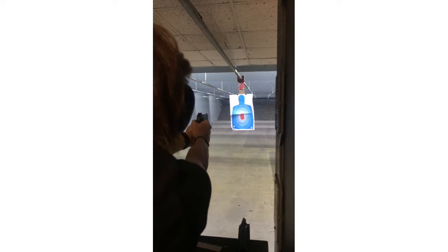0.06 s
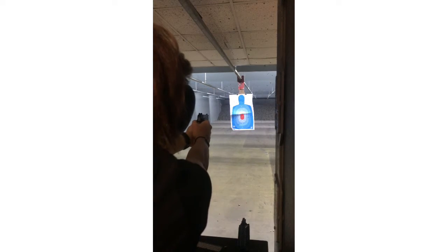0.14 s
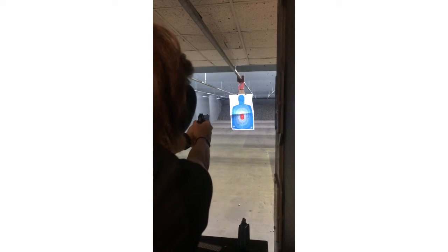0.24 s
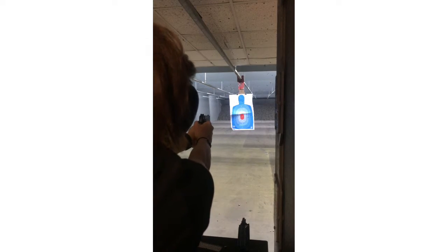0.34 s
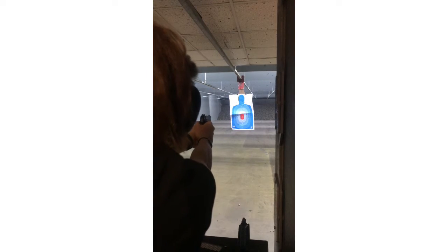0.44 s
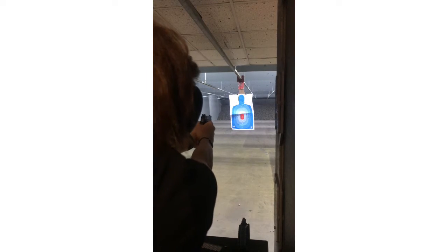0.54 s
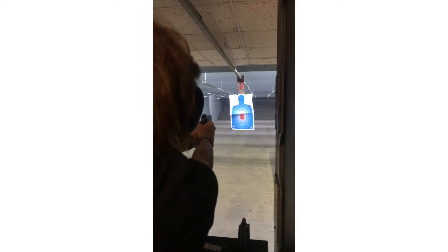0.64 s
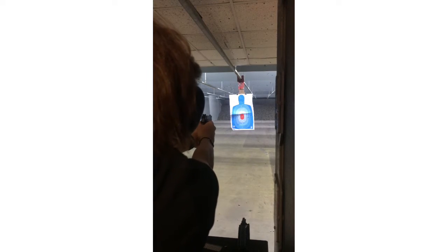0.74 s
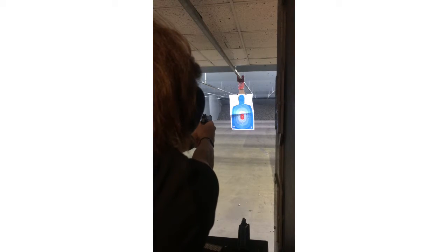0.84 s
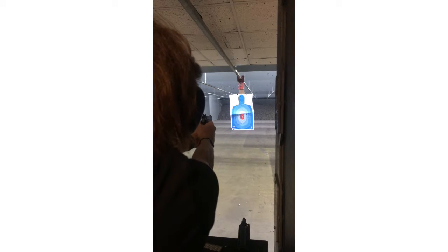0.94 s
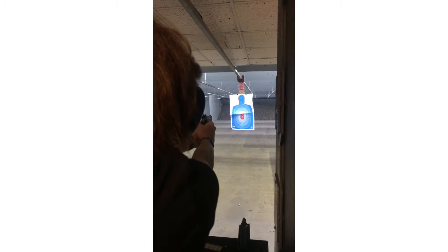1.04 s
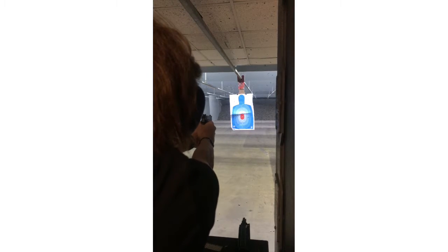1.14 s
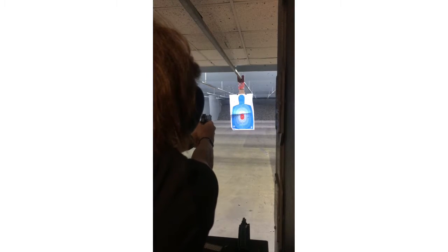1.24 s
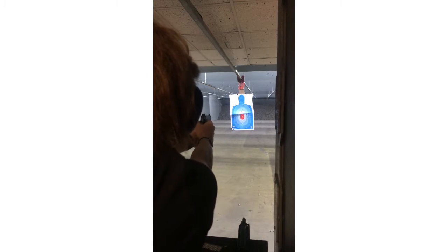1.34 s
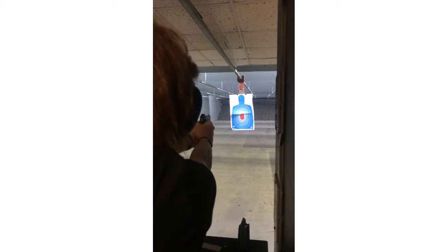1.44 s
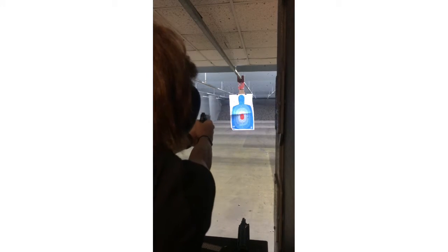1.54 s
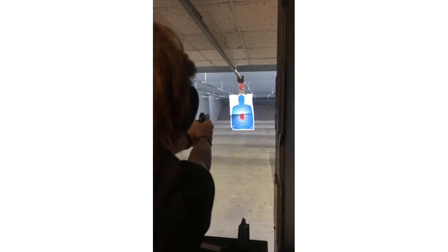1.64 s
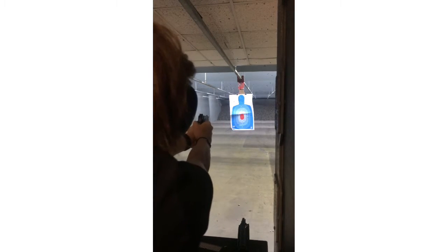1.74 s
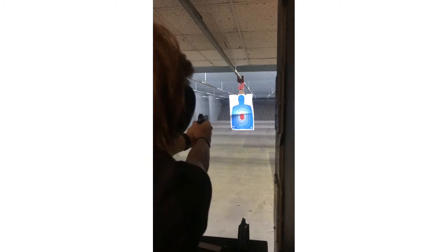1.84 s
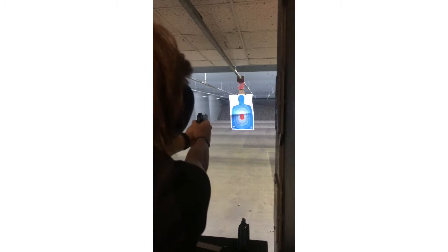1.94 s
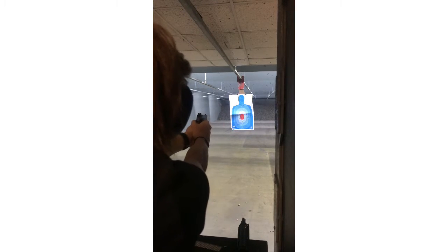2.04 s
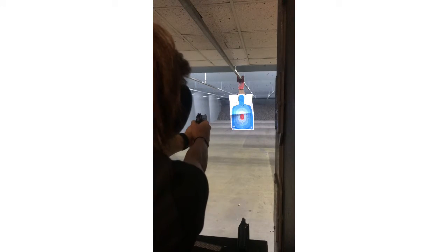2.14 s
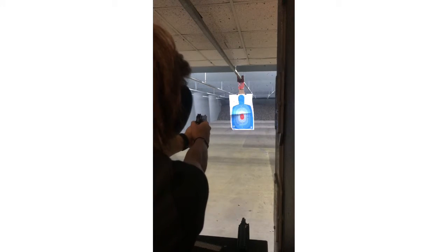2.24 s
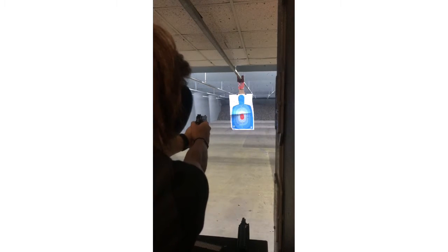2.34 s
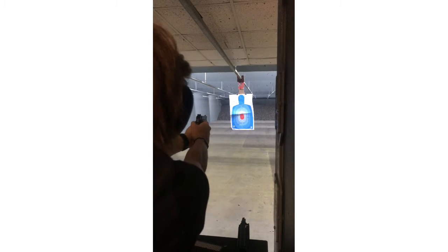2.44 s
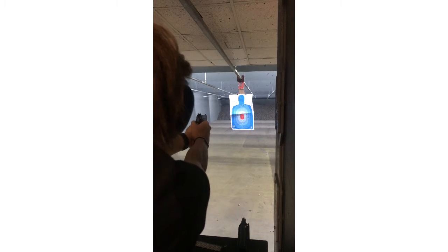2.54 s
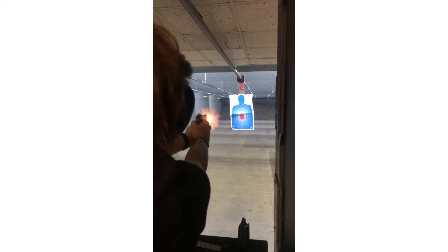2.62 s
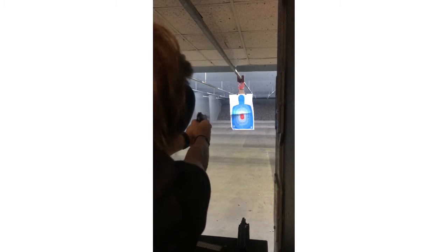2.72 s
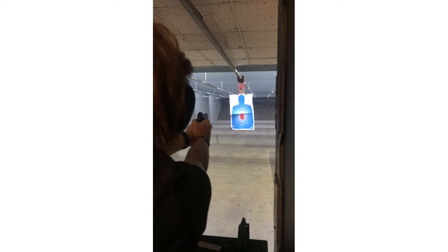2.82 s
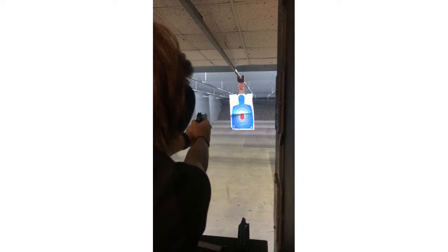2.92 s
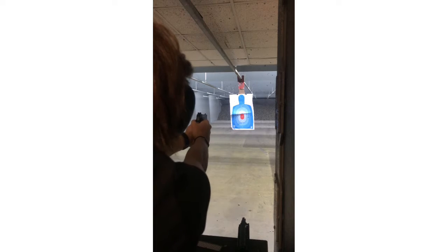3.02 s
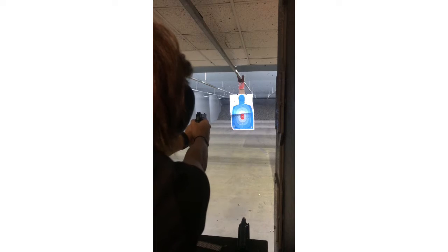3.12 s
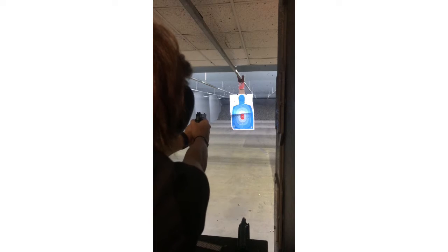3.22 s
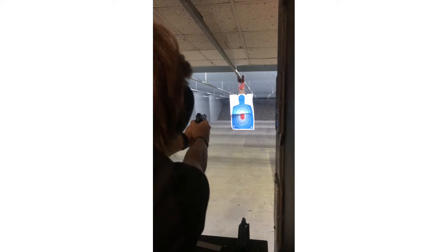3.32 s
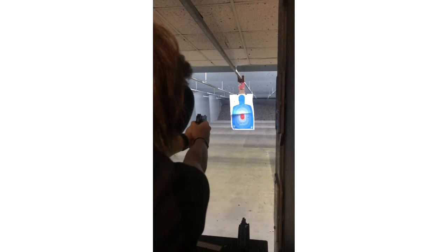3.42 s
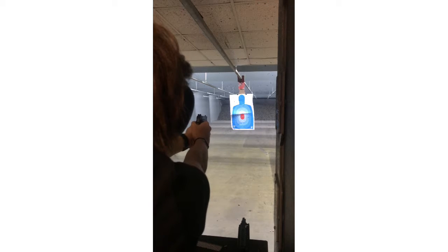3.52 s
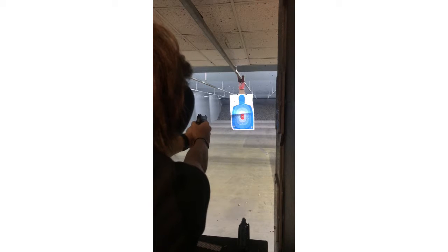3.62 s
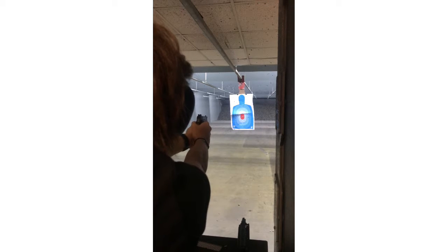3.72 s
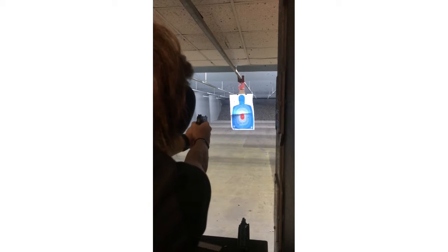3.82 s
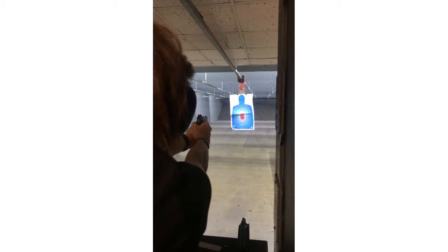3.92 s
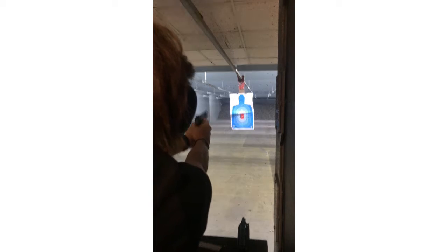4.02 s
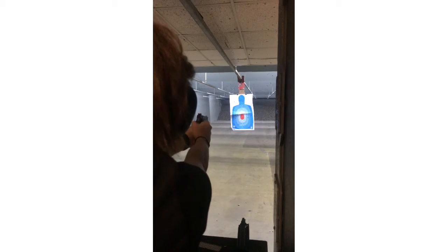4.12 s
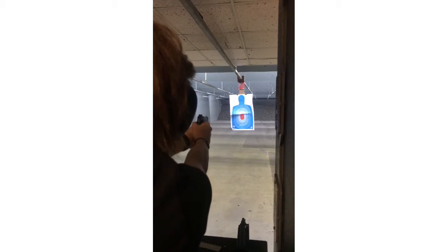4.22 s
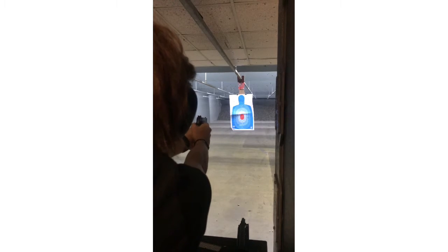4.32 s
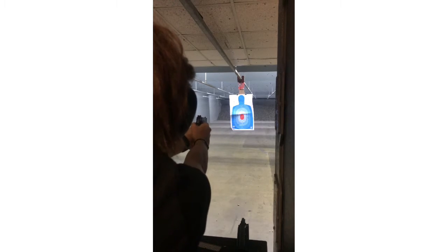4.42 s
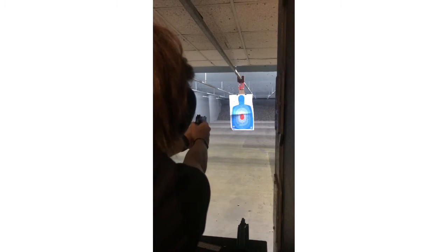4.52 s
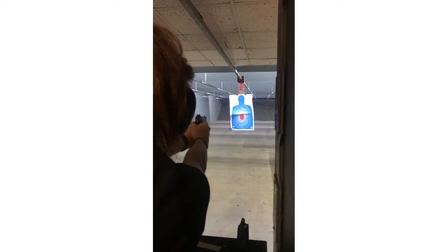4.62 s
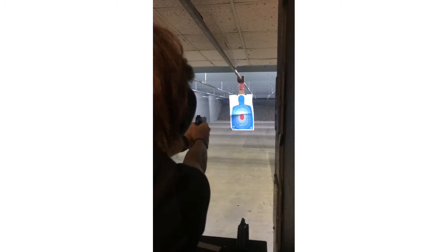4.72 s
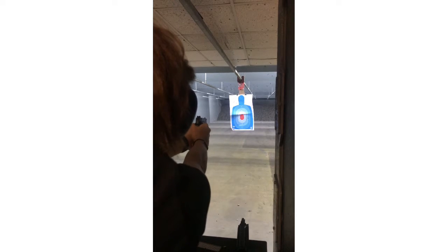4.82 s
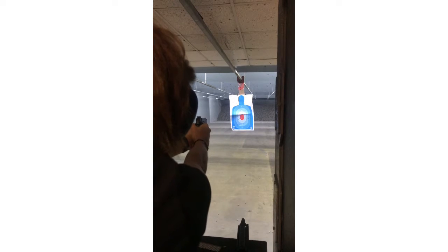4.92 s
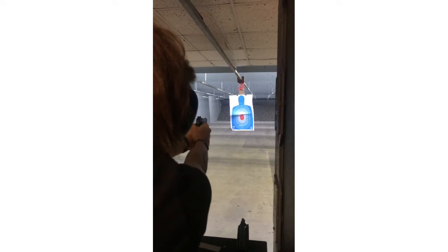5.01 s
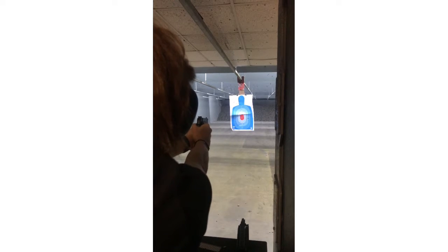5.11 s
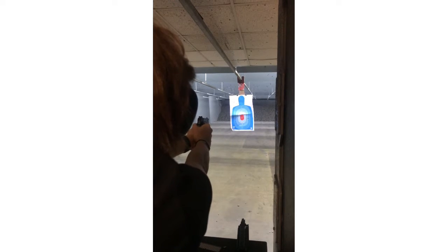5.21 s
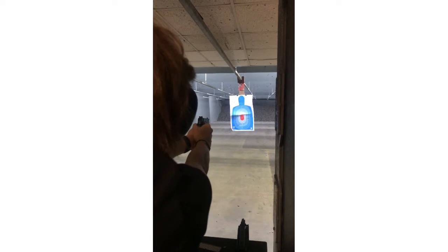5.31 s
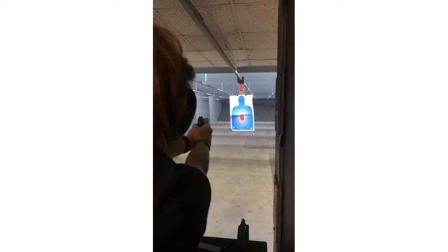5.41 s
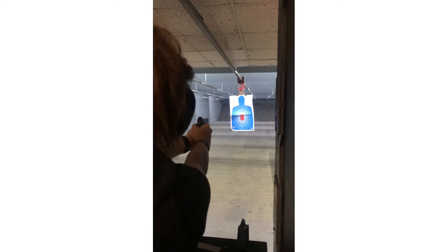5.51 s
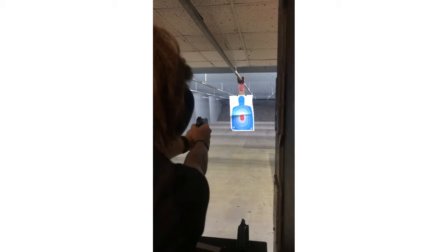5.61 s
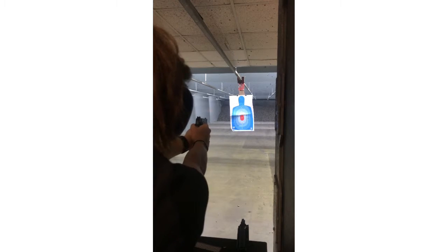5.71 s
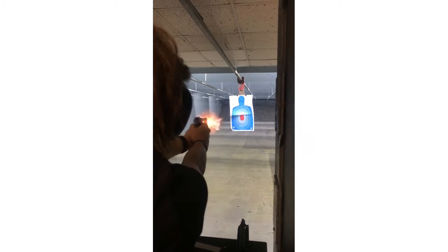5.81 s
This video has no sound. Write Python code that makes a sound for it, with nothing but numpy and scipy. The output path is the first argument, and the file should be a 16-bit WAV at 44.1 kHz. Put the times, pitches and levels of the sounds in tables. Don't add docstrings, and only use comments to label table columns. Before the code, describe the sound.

A handgun fires four spaced shots in a hard-walled booth; roar and lane echo fade into fan drone while spent cases click and ring.

```python
import sys
import numpy as np
from scipy import signal
from scipy.fft import rfft, irfft
from scipy.io import wavfile
from scipy.ndimage import uniform_filter1d

SR = 44100
rng = np.random.default_rng(int(sys.argv[2]) if len(sys.argv) > 2 else 0)


def volts_from_decibels(level):
    exponent = np.asarray(level, float) / 20
    return 10 ** exponent


def file_out(sig):
    cols = np.atleast_2d(sig).T
    lim = np.clip(cols, -1, 1)
    pcm = np.round(lim * 32767).astype(np.int16)
    wavfile.write(sys.argv[1], SR, pcm)


N = 258422


def read(points, at):
    return np.interp(at, *np.transpose(points), left=-120, right=-120)


def colour(points, hz):
    point_hz, value = np.transpose(points)
    return np.interp(np.log(hz + 1), np.log(point_hz + 1), value)


def evened(x):
    return x / np.sqrt(np.mean(x ** 2) + 1e-20)


def add(mix, s, sound):
    at = round(s * SR)
    part = mix[max(at, 0):][:len(sound) + min(at, 0)]
    part += sound[max(-at, 0):][:len(part)]


def resonate(x, hz, width):
    turn = np.exp(2j * np.pi * np.cumsum(hz * np.ones(len(x))) / SR)
    r = np.exp(-np.pi * width / SR)
    return 2 * (turn * signal.lfilter([1 - r], [1, -r], x / turn + 1e-18)).real


def resonate_twice(x, hz, width):
    return resonate(resonate(x, hz, width), hz, width)


def hiss(count, spectrum, change_db, size=512, patchy_db=1.5):
    hop = size // 4
    t = np.arange(count // hop + 5) * hop / SR
    hz = np.fft.rfftfreq(size, 1 / SR)[:, None]
    real, imaginary, patches = rng.standard_normal((len(t), len(hz), 3)).T
    patches = uniform_filter1d(patches, size=5, axis=0)
    patches = evened(uniform_filter1d(patches, size=8, axis=1))
    z = (real + 1j * imaginary) * volts_from_decibels(colour(spectrum, hz) + patchy_db * patches)
    both = np.array([z, z * volts_from_decibels(change_db(t, hz))])
    plain, shaped = signal.istft(both, nperseg=size, noverlap=size - hop)[1]
    return shaped[:count] / plain.std()


def echo(curve, spectrum, fade, from_s, size):
    t = np.arange(2 * SR) / SR

    def fade_db(s, hz):
        return -colour(fade, hz) * np.clip(s - from_s, -.2, .5)

    return hiss(len(t), spectrum, fade_db, size=size) * volts_from_decibels(read(curve, t))


# after_shot_s, level_db
ROAR_CURVE = [(0, -10), (.025, -11), (.035, -12), (.05, -8.5), (.085, -12), (.15, -25.5), (.2, -37.5),
              (.24, -48), (.4, -68)]
# freq_hz, level_db_per_hz
ROAR_COLOUR = [(71, -54), (120, -9), (417, -5.5), (567, 2), (628, -8), (819, -2.5), (1450, -10),
               (1820, -11), (2320, -13), (3220, -11), (3950, -14.5), (6330, -17), (12700, -26.5),
               (15900, -32.5)]
# freq_hz, loss_db_per_s
ROAR_FADE = [(60, 46), (250, -41), (700, 0), (2500, 50.5), (7000, 22), (13000, 62.5)]


def roar():
    return echo(ROAR_CURVE, ROAR_COLOUR, ROAR_FADE, 0.042, size=512)


# after_shot_s, level_db
LANE_CURVE = [(.1, -29), (.205, -36.5), (.235, -35), (.31, -36), (.4, -38.5), (.5, -45.5), (.7, -54),
              (1, -65.5), (1.5, -87.5)]
# freq_hz, level_db_per_hz
LANE_COLOUR = [(88, -37), (150, -11.5), (197, -5.5), (226, 2.5), (321, 4.5), (493, -28), (588, -7),
               (757, -7), (3750, -8.5), (7130, -18.5), (10500, -37), (12600, -50), (15900, -62.5)]
# freq_hz, loss_db_per_s
LANE_FADE = [(300, -1), (800, 20.5), (2500, -5), (7000, 10.5), (13000, 87)]


def lane_return():
    return echo(LANE_CURVE, LANE_COLOUR, LANE_FADE, 0.46, size=512)


def boom():
    start_s, rise_s, t60_s = 0.27, 0.031, 1
    t = np.arange(2 * SR) / SR - start_s
    ring = evened(resonate_twice(rng.standard_normal(len(t)), 113, 28))
    return ring * np.clip(t / rise_s, 0, 1) * volts_from_decibels(-30.5 - 60 * np.maximum(t, 0) / t60_s)


def answer():
    return roar() + lane_return() + boom()


def since_shot(t):
    times = np.array([EARLIER_S] + [row[0] for row in SHOTS])
    return t - times[np.searchsorted(times, t, "right") - 1]


def grip(t):
    wait_s, clamp_s, hold_s, release_s = 0.076, 0.067, 0.47, 0.56
    s = since_shot(t) - wait_s
    left = (clamp_s + hold_s + release_s - s) / release_s
    return np.clip(np.minimum(s / clamp_s, left), 0, 1)


# freq_hz, change_db
GRIP_DEPTH = [(30, -25), (80, -10.5), (300, -15), (500, -9.5), (1000, -4.5), (3000, -7.5), (8000, -9.5),
              (14000, -10)]


def air_change(s, hz):
    return colour(GRIP_DEPTH, hz) * grip(s)


# centre_s, depth_db, half_length_s
LULLS = [(0.23, -19, .03), (0.457, -19, 0.012), (1.4, 1, 0.015), (1.756, -14, 0.022), (2, -20, 0.026),
         (3.02, -8, .02), (3.2, -6.5, 0.056), (3.894, -10, 0.039), (4.253, -11, 0.023), (4.473, -20, 0.026),
         (4.622, -10, 0.025), (4.86, -14, 0.031), (5.087, -12, 0.029), (5.594, -16, 0.013),
         (5.813, -8, 0.017)]


def fan():
    blade_hz, level_db, grip_db = 77.86, -23.5, -11.5
    blur_hz, blur_db = 12, -15
    t = np.arange(N) / SR
    slow = signal.butter(2, 14, fs=SR, output="sos")
    wander = evened(signal.sosfilt(slow, rng.standard_normal(N)))
    tone = np.sqrt(2) * np.sin(2 * np.pi * blade_hz * t + 0.37 * wander)
    blur = evened(resonate_twice(rng.standard_normal(N), blade_hz, blur_hz))
    lull_db = sum(db * np.exp(-((t - s) / half) ** 2) for s, db, half in LULLS)
    return volts_from_decibels(level_db + grip_db * grip(t) + lull_db) * (tone + volts_from_decibels(blur_db) * blur)


# freq_hz, level_db_per_hz
AIR_COLOUR = [(15, -45.5), (25, -23), (43, -10.5), (64, -9), (82, -7), (107, -12), (235, -11.5),
              (528, -38.5), (605, -42), (751, -39), (1010, -38.5), (2820, -49), (3790, -50), (12100, -70),
              (15900, -81.5)]
# pitch_hz, width_hz, level_db
DUCT = [(620, 18, -50.5), (990, 64, -57.5)]


def ventilation():
    air = hiss(N, AIR_COLOUR, air_change, size=2048, patchy_db=1.6)
    whistles = sum(volts_from_decibels(db) * evened(resonate(rng.standard_normal(N), hz, w)) for hz, w, db in DUCT)
    whistles = whistles * volts_from_decibels(-3.0 - 6.3 * grip(np.arange(N) / SR))
    both = volts_from_decibels(-30 + 2.0) * air + whistles + fan()
    return signal.sosfiltfilt(signal.butter(3, 38, "high", fs=SR, output="sos"), both)


def tick(hz, width, t60):
    t = np.arange(SR // 3) / SR
    blow = resonate_twice(1. * (t == 0), hz, width)
    scatter = evened(resonate_twice(rng.standard_normal(len(t)), hz, width))
    decay = volts_from_decibels(-6.0 - 60 * t / 0.0095) + volts_from_decibels(-8 - 60 * t / t60) + volts_from_decibels(-45 - 60 * t / .3)
    return 0.96 * blow / abs(blow).max() + scatter * decay


def tube_ring(db, hz, t60):
    t = np.arange(SR // 3) / SR
    tube = np.sin(2 * np.pi * hz * t) + .4 * np.sin(2 * np.pi * (hz + 85) * t)
    lower = 0.3 * np.sin(2 * np.pi * .46 * hz * t) * volts_from_decibels(-60 * t / .1)
    ring = volts_from_decibels(db - 60 * t / t60) * (tube + lower) * np.minimum(t / 0.00092, 1)
    fuzz = evened(resonate(rng.standard_normal(len(t)), hz, 140))
    return ring + volts_from_decibels(db - 9.5 - 60 * t / (2 * t60)) * fuzz


# start_s, level_db, centre_hz, width_hz, scatter_t60_s
TICKS = [(.392, -54, 13500, 6000, .05), (.8725, -52, 7000, 9000, .05), (.983, -56, 11000, 8000, .04),
         (1.254, -44, 5660, 2000, .05), (1.2545, -46, 10000, 8000, .04), (1.379, -50, 8000, 9000, .05),
         (2.206, -45, 3300, 1470, .04), (2.3005, -30, 800, 700, .08), (2.3017, -32, 2800, 1970, 0.09),
         (2.3008, -41.5, 8500, 6000, 0.072), (3.097, -52, 14000, 4000, .03),
         (3.1905, -35, 4480, 4000, 0.055), (3.1905, -58, 12000, 6000, 0.046), (4.675, -47, 5700, 800, .06),
         (4.674, -44, 7550, 2500, 0.079), (4.674, -44, 13500, 5000, .04), (5.054, -32.5, 3150, 2500, 0.055),
         (5.057, -54, 5560, 2500, 0.087), (5.1429, -34, 5000, 3940, 0.052), (5.144, -48, 1900, 900, .04),
         (5.1433, -57, 13000, 6000, .04), (5.1897, -49, 2310, 1500, .04)]
# start_s, level_db, centre_hz, width_hz, scatter_t60_s
KNOCK = (5.1897, -32, 1030, 450, .04)
# start_s, level_db, pitch_hz, t60_s
RINGS = [(.393, -64, 12250, .2), (.873, -57, 12250, .25), (0.982, -48, 12260, 0.13),
         (1.255, -56, 12250, .2), (1.379, -52, 12280, 0.15), (1.816, -44, 12250, 0.093),
         (2.5, -72, 12300, .1), (3.1, -66, 11800, .1), (4.674, -49.5, 11780, 0.11), (5.058, -70, 11700, .1),
         (5.144, -50, 11700, 0.14), (5.385, -69, 11750, .12)]


def cases():
    out = np.zeros(N)
    for s, db, hz, width, t60 in [*TICKS, KNOCK]:
        add(out, s, volts_from_decibels(db) * tick(hz, width, t60))
    for s, db, hz, t60 in RINGS:
        add(out, s, tube_ring(db, hz, t60))
    return out


CHOKE_S = .022
# pitch_hz, width_hz, level_db
CHOKED = [(269.5, 110, -14), (617, 260, -2.5), (1242, 1300, -3.5), (2160, 1100, -9.5), (2856, 300, -7.5)]


def choke(rise_db, low_db):
    t = np.arange(round(1.5 * CHOKE_S * SR)) / SR
    u = t / CHOKE_S
    noise = rng.standard_normal(len(t))
    throb_db = 4.5 * np.cos(2 * np.pi * 340 * t) * np.clip(1.2 - u, 0, 1)
    flutter = volts_from_decibels(-33.5 - 4.8 * u + throb_db) * evened(signal.lfilter([1], [1, -.4], noise))
    ring = 0
    for hz, width, db in CHOKED:
        free = .7 if hz > 2500 else .95
        held_db = 36 * np.clip(1 - u / free, 0, 1) ** 1.7
        mode_db = db + low_db * (hz < 800) - held_db
        ring = ring + volts_from_decibels(mode_db) * evened(resonate_twice(noise, hz, width))
    dull = signal.sosfiltfilt(signal.butter(6, 3400, fs=SR, output="sos"), ring)
    return (flutter + volts_from_decibels(rise_db - 11.5) * dull) * np.clip((1.5 - u) / .4, 0, 1)


# after_shot_s, pitch_hz, level_db, half_length_s
FLARES = [
    (0, 530, -11, 0.0058),
    (0.00036, 264, -15, 0.005),
    (0.0233, 750, -13.5, 0.016),
    (0.06, 825, -18, 0.043),
    (0.0805, 455, -21.5, 0.0083),
    (.02, 560, -16.5, 0.016),
    (.045, 390, -21.5, 0.018),
    (0.083, 290, -15, 0.013),
    (0.093, 368, -18.5, 0.024),
    (0.0026, 10000, -33, 0.0084),
]


def flares():
    t = np.arange(SR // 5) / SR - CHOKE_S
    out = np.zeros(len(t))
    for s, hz, db, half in FLARES:
        out += volts_from_decibels(db) * np.sin(2 * np.pi * (hz * t + rng.random())) * np.exp(-((t - s) / half) ** 2)
    return out


def thump():
    t = np.arange(SR // 10) / SR
    swing = np.sin(2 * np.pi * 95 * (t - .0365)) * np.exp(-((t - .037) / 0.0048) ** 2)
    heave = np.sin(2 * np.pi * 40 * (t - .03)) * np.exp(-((t - .038) / 0.03) ** 2)
    return volts_from_decibels(-6.5) * swing + volts_from_decibels(-24.0) * heave


def crack(db):
    t = np.arange(SR // 40) / SR
    bright = evened(np.diff(rng.standard_normal(len(t) + 1)))
    return volts_from_decibels(db - 60 * t / 0.068) * np.minimum(t / 0.00116, 1) * bright


EARLIER_S = -0.34
# start_s, level_db, crack_db, housing_rise_db, low_ring_db
SHOTS = [
    (1.488, 2, -7, -1.5, 4.5),
    (2.665, 2, -10, -0.5, -1.5),
    (4.044, 1.5, -14, 0.5, -4),
    (5.825, 1.5, -15.5, 1.5, -3.5),
]
# freq_hz, share_0_to_1
LIKENESS = [(100, .9), (700, .97), (2500, .88), (6500, .6), (12000, .3)]


def shots():
    out = np.zeros(N)
    common = rfft(answer())
    swells = flares()
    same = np.clip(colour(LIKENESS, np.arange(SR + 1) / 2), 0, 1)
    add(out, EARLIER_S, irfft(common))
    for s, db, crack_db, rise_db, low_db in SHOTS:
        mixed = irfft(same * common + np.sqrt(1 - same ** 2) * rfft(answer()))
        add(out, s - CHOKE_S, choke(rise_db, low_db))
        add(out, s - CHOKE_S, volts_from_decibels(db) * swells)
        add(out, s, volts_from_decibels(db) * mixed[:3 * SR // 2])
        add(out, s, volts_from_decibels(db) * thump())
        add(out, s, crack(crack_db))
    return out


def scene():
    return (shots() + ventilation() + cases())[None]


def top_cut(x):
    return signal.sosfilt(signal.butter(12, 16020, fs=SR, output="sos"), x)


# freq_hz, width_hz, level_db
NOTCHES = [(4900, 480, -6.5), (10600, 780, -6.5)]


def record(dry):
    x = dry[0]
    for hz, width, db in NOTCHES:
        x = x - (1 - volts_from_decibels(db)) * resonate(x, hz, width)
    x = signal.sosfilt(signal.butter(2, 28, "high", fs=SR, output="sos"), x)
    bent = x / (1 + abs(x) ** 6) ** (1 / 6)
    band_limit = signal.firwin(1023, 15790, window=("kaiser", 5), fs=SR)
    edged = signal.oaconvolve(bent, band_limit, "same")
    finished = np.clip(edged, -1, 1)[None]
    return top_cut(finished)


dry = scene()
out = record(dry)
file_out(out)
```